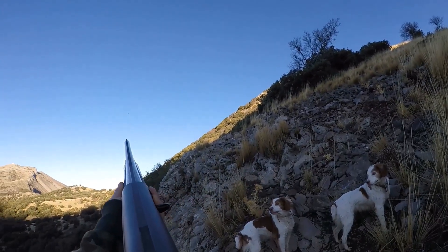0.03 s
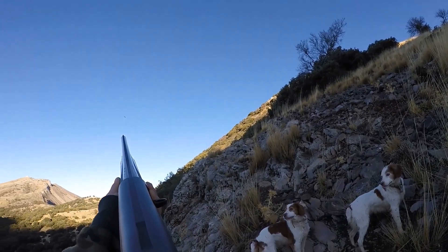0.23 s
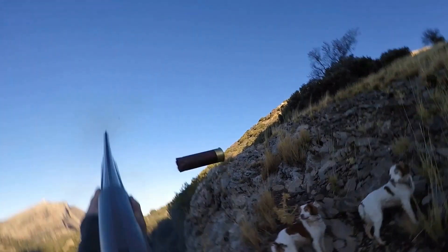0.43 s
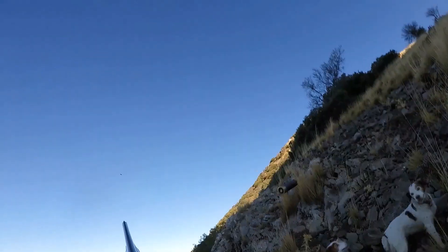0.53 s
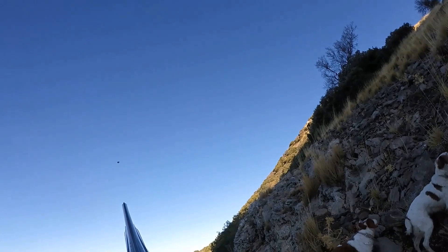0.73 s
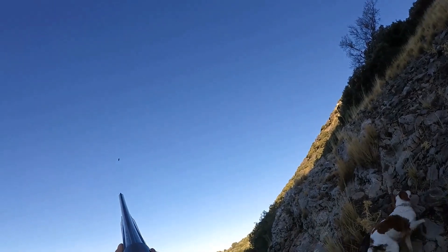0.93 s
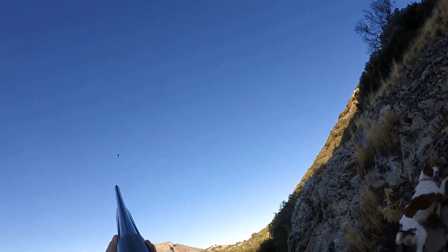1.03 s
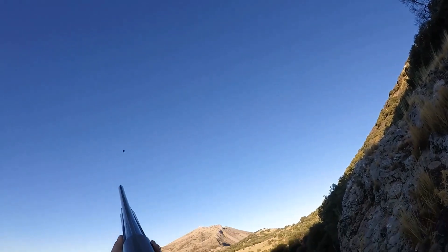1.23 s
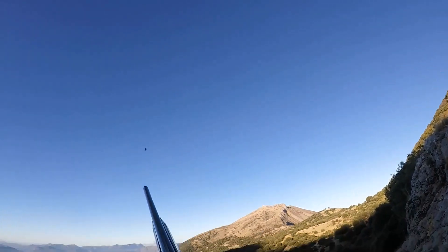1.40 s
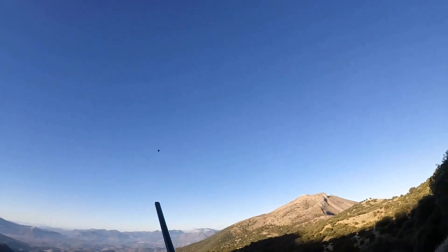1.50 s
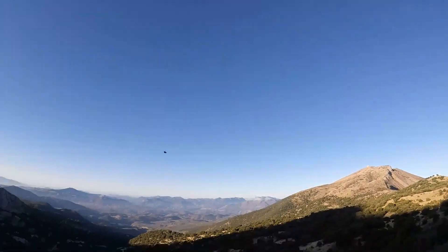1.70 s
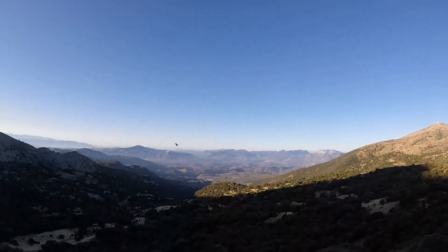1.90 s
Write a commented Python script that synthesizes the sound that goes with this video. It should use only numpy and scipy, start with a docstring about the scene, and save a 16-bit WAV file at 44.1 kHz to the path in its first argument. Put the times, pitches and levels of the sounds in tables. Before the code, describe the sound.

Low wind buffets a microphone riding on a shotgun outdoors in the mountains. One loud shot goes off with a hard clack, distant slopes return a soft echo, and scattered metallic handling clicks follow over a thin hiss.

```python
"""A shotgun on a windy mountain slope

One shot is heard from a small cased camera riding on the gun. The hammer snaps; blast and recoil
excite the modes of the case and shake its mount. The gun rattles once and far slopes echo the shot.
Light handling clicks and faint squeaks reach the same case, over wind and a thin hiss."""
import sys
import numpy as np
from scipy import signal
from scipy.fft import rfft, irfft
from scipy.io import wavfile

SR = 44100
rng = np.random.default_rng(int(sys.argv[2]) if len(sys.argv) > 2 else 0)


def inscribe(sig):
    """Save sig as 16-bit PCM at rate SR to the path in sys.argv[1].

    A 1-D sig is mono; a 2-D sig holds one channel per row.
    Samples are clipped to [-1, 1] before scaling.
    """
    pcm = np.round(np.clip(np.atleast_2d(sig).T, -1, 1) * 32767)
    wavfile.write(sys.argv[1], SR, pcm.astype(np.int16))


N = 85995
T = np.arange(N) / SR

# Phase between the two microphone ports, for sound from the open air and sound at the case.
# Each row: frequency in Hz, lead of the left port in radians.
AIR_LEAD = [(30, .1), (300, .3), (650, -.4), (900, -1.8), (1300, -3.2), (2000, -5.5), (4200, -6.5),
            (7400, -7.6), (12000, -7.6)]
NEAR_LEAD = [(30, -.1), (150, .7), (400, .2), (850, -.5), (1300, -2.8), (1900, -5.7), (4000, -6.5),
             (6000, -7.2), (12000, -7.6)]
# Balance of the ports for the same two paths. Each row: frequency in Hz, left minus right in dB.
AIR_BALANCE = [(30, -1), (300, 0), (700, -2), (1250, -8), (2200, -5), (4000, -4), (6000, -2), (12000, -4)]
NEAR_BALANCE = [(30, -1), (300, -3), (700, -2), (1250, -4), (2200, -1), (4000, 0), (6000, -1), (12000, -4)]


def shot():
    """Impacts travel through the stock while the blast radiates and scatters off near rocks."""
    # Hammer, blast, recoil and jolts of the mount. Each row: start in seconds, then the gains
    # of thud, knock, clack, ring and top in dB.
    blows = [(0.4282, -28.5, -15.5, -23.5, -18, -25.5), (0.4330, -42, -36, -32, -29, -41.5),
             (0.4395, -24.5, -26.5, -27, -29, -41), (0.4498, -8.5, -16.5, -12, -24.5, -29),
             (0.4603, -6, -12, -9.5, -20, -22.5), (0.4664, -22, -18.5, -16, -2.5, -16),
             (0.4711, -11, -14, -3, -18, -11.5), (0.4789, -23, -27.5, -29, -23.5, -26),
             (0.4860, -37, -28, -29, -25, -33.5), (0.4936, -43, -36.5, -32, -32, -40.5)]
    blow_pans = [-1, 0, 0, -1, -2, -11, -1, -2, -2, -2]  # For each blow: left minus right in dB.
    # Spectra of the report and its scatter. Each row: frequency in Hz, relative level in dB.
    report_spectrum = [(40, -3.5), (70, 10), (130, 10), (220, 3), (380, -0.5), (800, -7), (1300, -1),
                       (2200, -7.5), (4000, -4), (5200, -7), (6500, -8), (8100, -13.5), (9500, -19.5),
                       (15500, -30.5)]
    scatter_spectrum = [(60, 0), (200, 21.5), (500, -10), (1250, 0.5), (2200, -2.5), (4000, -6.5),
                        (6300, -1.5), (8000, -20), (15000, -30.5)]
    out = np.zeros((2, N))
    for (start, *tone_db), pan_db in zip(blows, blow_pans):
        add(out, start, knock(tone_db, pan_db))
    t = T - 0.467  # seconds from the peak of the report
    rise_db_per_s, fall_db_per_s = 562, 600
    after_hammer = np.clip((T - blows[0][0]) / .005, 0, 1)
    rise = amp(rise_db_per_s * np.minimum(t, 0)) * after_hammer
    report = amp(-19 - fall_db_per_s * np.maximum(t, 0)) * noise(report_spectrum)
    scatter = amp(-42) * fade(t, t60=.62) * noise(scatter_spectrum, AIR_BALANCE, AIR_LEAD)
    return out + rise * (report + scatter)


def knock(tone_db, pan_db, size=4096):
    """An impact makes a broadband crack and excites damped modes, each weighted by its spectrum."""
    tone_hz = [900, 1250, 3900, 6000, 10000]  # Frequencies in Hz of thud, knock, clack, ring and top.
    # Modes of the camera case. Each row: frequency in Hz, level in dB, T60 in seconds.
    case_modes = [(738, -9.5, 0.018), (826, -4, 0.012), (1245, -11.5, 0.04), (2650, -10, 0.01),
                  (2940, -9.5, 0.012), (3810, -7.5, 0.015), (3947, -2, 0.0083), (5146, -4.5, 0.014),
                  (5396, -9, .016), (5920, -2.5, .007), (6340, -11.5, 0.019), (7530, -12, .010),
                  (10600, -9, 0.0035)]
    # Spectrum of the crack. Each row: frequency in Hz, relative level in dB.
    crack_spectrum = [(100, -16.5), (500, -12), (1500, 1.5), (2200, -1.5), (4000, 1.5), (7000, -2),
                      (9000, -6), (13000, -13), (15500, -27)]
    t = T[:size]
    tone = list(zip(tone_hz, tone_db))
    colour = amp(value_at(tone, np.fft.rfftfreq(size, 1 / SR)))
    crack = irfft(rfft(noise(crack_spectrum, size=size)) * colour)
    out = amp(-3) * crack * fade(t, t60=0.012)
    for hz, db, t60 in case_modes:
        phase = np.array([[0], [-1]]) * value_at(NEAR_LEAD, hz)
        gain = amp(db + value_at(tone, hz)) * sides(value_at(NEAR_BALANCE, hz))
        out += gain * fade(t, t60) * np.sin(2 * np.pi * hz * t + phase)
    contact_s = 0.00011
    return out * (1 - np.exp(-t / contact_s)) * sides(pan_db)


def recoil():
    """The kick's impulse shoves the camera and leaves its mount and the steel in free vibration."""
    centre_s, width_s = .4625, .0052
    u = (T - centre_s) / width_s
    shove = amp(-17) * (1 - u ** 2) * np.exp(-u ** 2 / 2)
    mount = ring(start=.4557, hz=152, t60=0.077, db=-12.5)
    steel = ring(start=.4496, hz=7920, t60=.11, db=-30)
    return (shove + mount + steel) * sides(-2)


def rattle():
    """Contacts chatter as the barrel jumps: noise with a fast decay and a softer, slower ring."""
    # Contacts in the gun. Each row: start in seconds, hold in seconds, level in dB.
    contacts = [(0.5944, 0.004, -44.5), (0.5979, 0.008, -42.5)]
    # Spectrum of the chatter. Each row: frequency in Hz, relative level in dB.
    spectrum = [(180, -22), (300, -15), (1640, -2), (1940, 0), (2790, -5.5), (3130, -0.5), (4210, -6.5),
                (5850, 0.5), (7620, -9.5), (12900, -23), (15500, -40)]
    envelope = np.zeros(N)
    for start, hold, db in contacts:
        t = T - start - hold
        envelope += (T > start) * amp(db) * (fade(t, t60=0.02) + amp(-3) * fade(t, t60=0.14))
    return envelope * noise(spectrum) * sides(-2)


def echoes():
    """Reflection from far slopes smears the shot in time, and air absorption dulls it."""
    # Reflections. Each row: peak time, rise and T60 in seconds, level in dB, air cut-off in Hz.
    reflections = [(0.773, 0.0086, 0.064, -45, 7200), (0.79, 0.17, 0.74, -50, 1900)]
    # Echo spectrum before absorption. Each row: frequency in Hz, relative level in dB.
    spectrum = [(80, -23), (300, 1.5), (700, -0.5), (1250, 3), (2200, -5.5), (4000, -7.5), (6300, -5.5),
                (8000, -18.5), (15000, -41)]
    out = np.zeros((2, N))
    for peak_s, rise_s, t60, db, cut_hz in reflections:
        dulled = [(hz, band_db - 10 * np.log10(1 + (hz / cut_hz) ** 2)) for hz, band_db in spectrum]
        swell = np.exp(-(np.minimum(T - peak_s, 0) / rise_s) ** 2)
        out += amp(db) * swell * fade(T - peak_s, t60) * noise(dulled, AIR_BALANCE, AIR_LEAD)
    return out


def handling():
    """Light metal impacts excite the modes of the case as the gun is lowered."""
    # Clicks. Each row: start in seconds, then level, brightness, knock and left minus right in dB.
    clicks = [(0.659, -43, -19, -6, 14), (1.0087, -52.5, -2, 13, -3.5), (1.1403, -26, -5, -7.5, -9.5),
              (1.1488, -39.5, 4, -6.5, -5.5), (1.1803, -60, 7, -17.5, -7.5), (1.4223, -43, 8.5, 8.5, -4.5),
              (1.4424, -48, 9.5, 0, -20), (1.6359, -42, 5.5, 6.5, -11), (1.6555, -26.5, -14, 0.5, -12),
              (1.7745, -57.5, 6, -13, 12), (1.8134, -42.5, 3.5, -9.5, 1), (1.875, -33.5, 3, -2.5, -10),
              (1.9271, -50.5, 5, 5, -20), (1.9375, -42.5, 3, -8, -7)]
    thud_db, clack_db, top_db = -25.5, -10, -5
    out = np.zeros((2, N))
    for start, db, bright_db, knock_db, pan_db in clicks:
        tone_db = db + np.array([thud_db, knock_db, clack_db, 0, top_db + bright_db])
        add(out, start, knock(tone_db, pan_db))
    return out


def squeaks(bandwidth_hz=33):
    """Friction as the gun swings makes narrow bands of noise that glide in pitch."""
    # Rubs. Each row: centre and half length in seconds, centre pitch in Hz, glide in Hz per second,
    # level in dB.
    rubs = [(0.413, .016, 1203, -5000, -47.5), (1.911, 0.029, 1544, 4521, -55.5)]
    pole = np.exp(-np.pi * bandwidth_hz / SR)
    out = np.zeros((2, N))
    for centre_s, half_s, hz, glide, db in rubs:
        t = T - centre_s
        grain = signal.lfilter([1], [1, -pole], [1, 1j] @ rng.standard_normal((2, N)))
        carrier = np.exp(2j * np.pi * (hz * t + glide * t ** 2 / 2))
        tone = (grain / np.std(grain) * carrier).real
        out += amp(db) * np.exp(-(t / half_s) ** 2) * tone * sides(-5)
    return out


def grip(start=0.88, ticks_per_s=46, growth_db_per_s=9.5):
    """Shifting hands make a Poisson train of tiny impacts, growing louder as the gun is lowered."""
    hits = (rng.random(N) < ticks_per_s / SR) * (T > start)
    spread_db = 3.5 * np.minimum(rng.exponential(1, N), 3)
    strength = amp(-70.5 + growth_db_per_s * (T - start) + spread_db)
    tick = knock(tone_db=[-20, -8, -8, 0, -6], pan_db=-4)
    return signal.oaconvolve((hits * strength)[None], tick)[:, :N]


def wind(shot_s=0.467):
    """Turbulence rumbles and buffets on the case, over open air and a hiss duller after the shot."""
    # Envelopes of the four layers. Each row: time in seconds, level in dB.
    rumble_levels = [(0, -40), (.22, -30.5), (.4, -35), (.55, -36.5), (.72, -41), (.82, -57), (1.05, -54.5),
                     (1.25, -53), (1.52, -47), (1.6, -40.5), (1.8, -31.5), (1.95, -40.5)]
    buffet_levels = [(0, -37.5), (.15, -40.5), (.38, -42.5), (.5, -41.5), (.6, -50.5), (.72, -51),
                     (.8, -63), (1.1, -71.5), (1.8, -64.5), (1.95, -63)]
    air_levels = [(0, -53.5), (.09, -55.5), (.14, -53.5), (.19, -54), (.4, -51.5), (.6, -65), (1.0, -58),
                  (1.3, -57.5), (1.6, -54.5), (1.85, -56), (1.95, -55)]
    hiss_levels = [(0, -61), (.4, -61), (.6, -55.5), (.95, -78), (1.3, -72), (1.6, -69), (1.88, -64.5),
                   (1.94, -58)]
    # Their spectra. Each row: frequency in Hz, relative level in dB.
    rumble_spectrum = [(8, -14.5), (20, -6.5), (32, 3.5), (45, -12.5), (65, -18), (110, -41), (250, -48),
                       (800, -92.5)]
    buffet_spectrum = [(25, -10.5), (70, 1.5), (190, -3), (320, -6.5), (500, -20), (1000, -43), (2500, -50),
                       (8000, -80)]
    air_spectrum = [(60, -8), (200, -7.5), (400, 0.5), (800, -5), (1250, -4.5), (1900, -9.5), (2800, -19.5),
                    (5000, -27), (15000, -49)]
    bright_hiss = [(500, -9.5), (2500, 1.5), (4000, -3), (6000, -1), (8500, 1.5), (11000, -2.5),
                   (13500, -12), (15500, -24)]
    dull_hiss = [(500, -6), (2500, 1), (4000, -2.5), (6300, -4), (8000, -6.5), (11000, -15), (13500, -27),
                 (15500, -38)]
    late = np.clip((T - shot_s) / .1, 0, 1)
    hiss = (1 - late) * noise(bright_hiss) + late * noise(dull_hiss, AIR_BALANCE, AIR_LEAD)
    air = (1 - late) * noise(air_spectrum) + late * noise(air_spectrum, AIR_BALANCE, AIR_LEAD)
    rumble = level(rumble_levels) * noise(rumble_spectrum)
    buffet = level(buffet_levels) * gusts() * noise(buffet_spectrum)
    return rumble + buffet + level(air_levels) * air + level(hiss_levels) * hiss


def gusts(depth_db=4, smoothing_s=0.022):
    """Random amplitude modulation makes the buffeting lumpy."""
    hz = np.fft.rfftfreq(N, 1 / SR)
    slow = irfft(rfft(rng.standard_normal(N)) * np.exp(-(hz * smoothing_s) ** 2), N)
    return amp(depth_db * slow / np.std(slow))


def noise(spectrum, balance=NEAR_BALANCE, lead=NEAR_LEAD, size=N):
    """Coloured noise of unit RMS reaches two spaced ports with partial coherence."""
    # Likeness of the ports. Each row: frequency in Hz, a ratio that is clipped to 0..1 for coherence.
    likeness = [(30, 0.9), (150, 1.4), (350, 0.52), (700, 0.4), (1300, 0.37), (3000, -0.26), (6000, 1.75),
                (12000, 0.2)]
    hz = np.fft.rfftfreq(size, 1 / SR)
    common, separate = rfft(rng.standard_normal((2, size)))
    coherence = np.clip(value_at(likeness, hz), 0, 1)
    left = common * np.exp(1j * value_at(lead, hz))
    right = coherence * common + np.sqrt(1 - coherence ** 2) * separate
    gain = amp(value_at(spectrum, hz)) * sides(value_at(balance, hz))
    pair = irfft(np.array([left, right]) * gain, size)
    return pair / np.sqrt(np.mean(pair ** 2))


def ring(start, hz, t60, db):
    """A struck mode vibrates as a damped sinusoid."""
    t = np.maximum(T - start, 0)
    return amp(db) * np.sin(2 * np.pi * hz * t) * fade(t, t60)


def fade(t, t60):
    """Exponential decay from t = 0 loses 60 dB every t60 seconds."""
    return np.exp(-np.log(1000) * np.maximum(t, 0) / t60)


def amp(db):
    """Amplitude grows tenfold with every 20 dB."""
    return 10 ** (np.asarray(db) / 20)


def value_at(points, hz):
    """Interpolation on a log-frequency axis gives a curve's value at hz."""
    frequencies, values = np.transpose(points)
    return np.interp(np.log(hz + 1), np.log(frequencies + 1), values)


def level(points):
    """Interpolation in decibels gives a gain over time."""
    return amp(np.interp(T, *np.transpose(points)))


def sides(db):
    """A level difference splits evenly into left and right gains."""
    return amp(np.array([[.5], [-.5]]) * db)


def add(mix, start, sound):
    """A stereo sound is superposed on the mix from start seconds."""
    part = mix[:, round(start * SR):][:, :sound.shape[1]]
    part += sound[:, :part.shape[1]]


def scene():
    """All sources sum at the camera by superposition."""
    return shot() + recoil() + rattle() + echoes() + handling() + grip() + squeaks() + wind()


def record(dry, cutoff_hz=15900):
    """Overload clips the loudest peaks, and a low-pass filter limits the band."""
    clipped = np.clip(dry, -1, 1)
    low_pass = signal.firwin(511, cutoff_hz, window=("kaiser", 9), fs=SR)
    return signal.oaconvolve(clipped, low_pass[None], "same")


dry = scene()
out = record(dry)
inscribe(out)
```